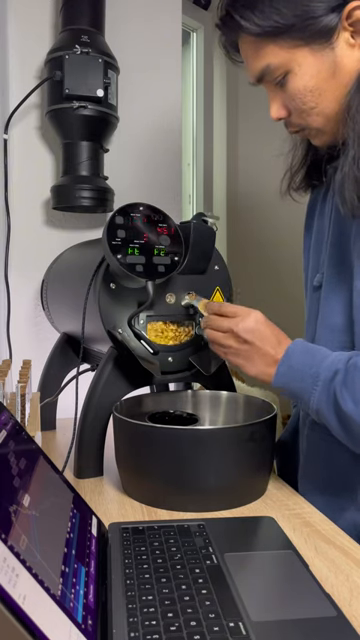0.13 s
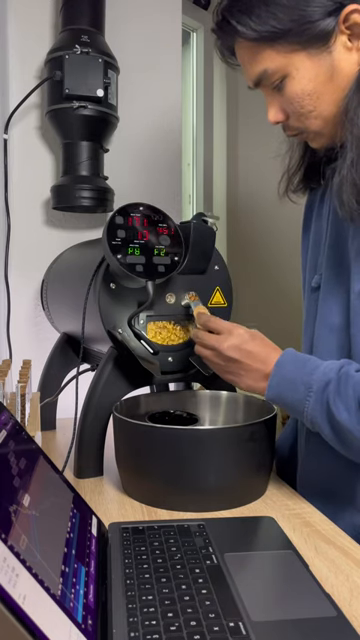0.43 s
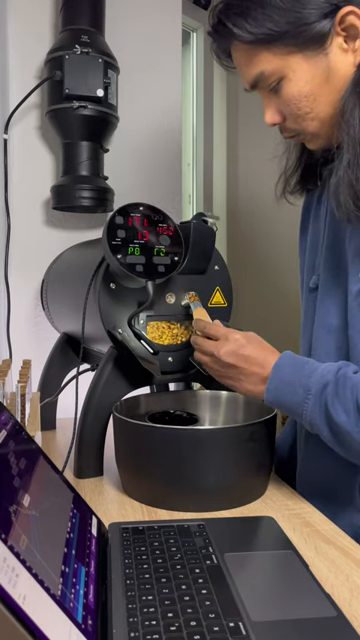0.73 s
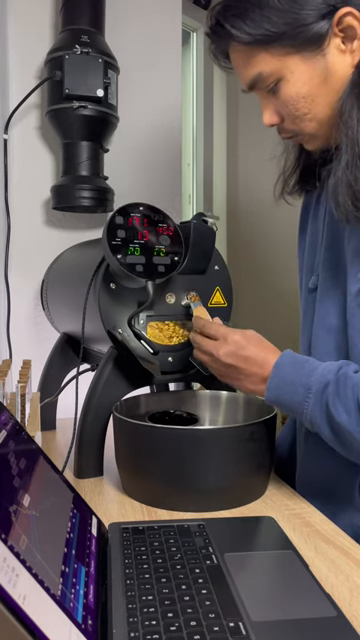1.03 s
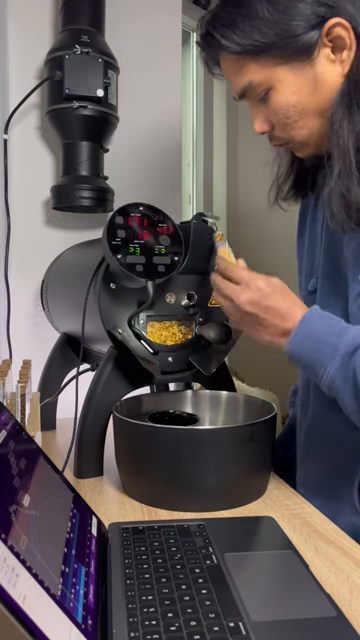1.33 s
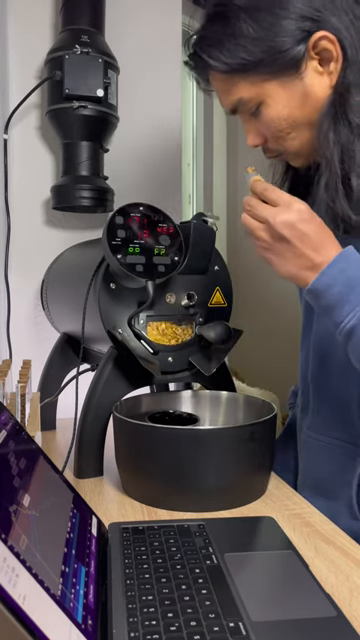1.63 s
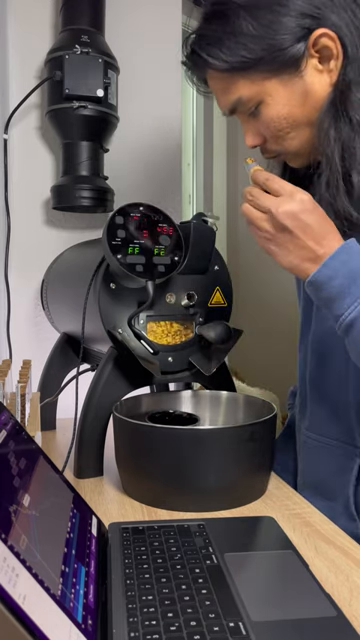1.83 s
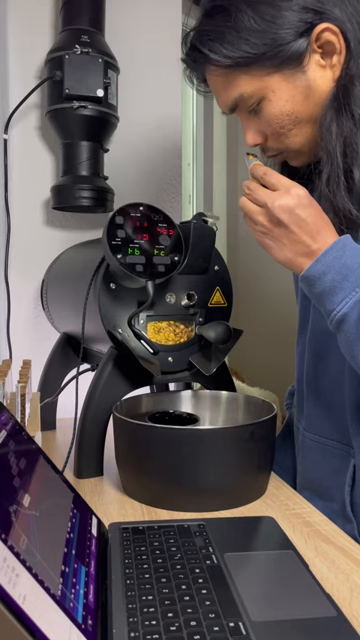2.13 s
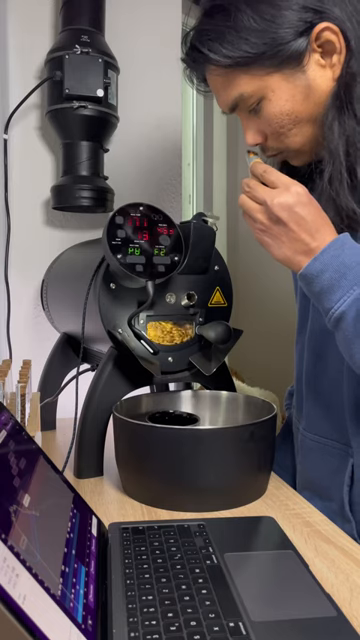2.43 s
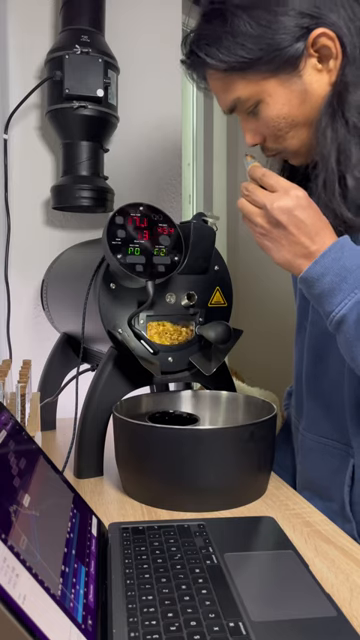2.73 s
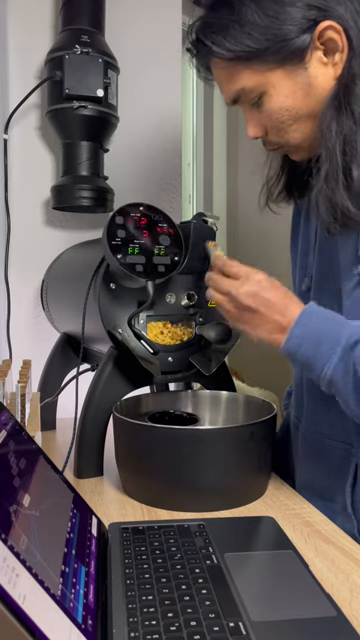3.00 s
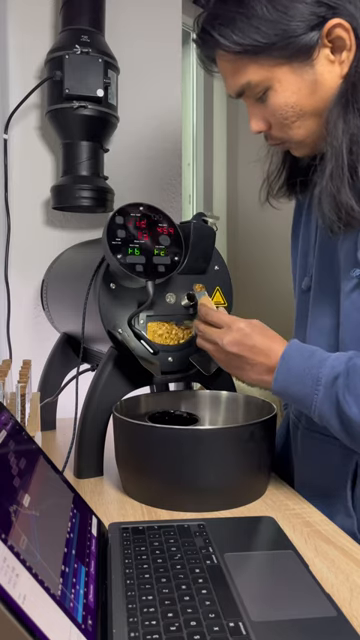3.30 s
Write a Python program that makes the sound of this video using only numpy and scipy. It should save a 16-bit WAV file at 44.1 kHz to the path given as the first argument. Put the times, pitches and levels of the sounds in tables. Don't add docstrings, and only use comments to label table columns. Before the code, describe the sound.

Continuous roasting machine in a small room: beans shower on ringing steel in rapid pulsing swishes, duct air rushes, a mid-pitched motor hum holds, faint low traffic rumbles behind; heard in stereo from a metre.

```python
import sys
import numpy as np
from scipy import signal
from scipy.fft import rfft, irfft, next_fast_len
from scipy.io import wavfile
from scipy.ndimage import uniform_filter1d

SR = 44100
rng = np.random.default_rng(int(sys.argv[2]) if len(sys.argv) > 2 else 0)


def int16_out(signal):
    q = np.round(np.clip(np.atleast_2d(signal).T, -1, 1) * 32767)
    wavfile.write(sys.argv[1], SR, q.astype(np.int16))


def ratio(d):
    e = np.asarray(d, float) / 20
    return 10 ** e


N = 152586
SIZE = next_fast_len(N + SR)
HZ = np.arange(SIZE // 2 + 1) * SR / SIZE + 1e-3


def level(x, db):
    return x * ratio(db) / np.sqrt(np.mean(x ** 2))


def along(table, axis=1):
    rows = np.array(table)
    return np.interp(np.log(HZ), np.log(rows[:, 0]), rows[:, axis])


def ring(hz, width, db):
    return ratio(db) / (1 + 1j * (HZ - hz ** 2 / HZ) / max(width, 2))


def walk(rate):
    hold = int(SR / rate)
    steps = np.repeat(rng.standard_normal(N // hold + 1), hold)
    return 1.456 * uniform_filter1d(uniform_filter1d(steps, hold), hold)[:N]


def ports(shared, other, table):
    like = np.clip(along(table), 0, 1)
    turn = np.exp(.5j * along(table, axis=2)) * ratio(along(table, axis=3) / 2)
    common = np.sqrt(.5 + like / 2) * shared
    opposed = np.sqrt(.5 - like / 2) * other
    return irfft(np.array([(common + opposed) * turn, (common - opposed) / turn]), SIZE)[:, :N]


def spilling():
    # (start [s], level [dB], rise [s], fall [s])
    spills = [(-.06, 2.5, 0.025, 0.11), (.19, 0.5, 0.039, 0.16), (.455, -2, 0.016, 0.15),
              (.70, 2, 0.046, 0.13), (.96, 4.5, 0.074, 0.1), (1.21, 3, 0.076, 0.13),
              (1.485, 2, 0.039, 0.11), (1.76, 0, 0.018, 0.12), (2.0, -0.5, 0.019, 0.15),
              (2.24, -0.5, 0.02, 0.19), (2.5, -0.5, 0.034, 0.16), (2.74, 0.5, 0.08, 0.15),
              (3.02, 2, 0.048, .13), (3.25, 2.5, 0.078, 0.13)]
    # (start [s], level [dB], rise [s], fall [s])
    clumps = [
        (.10, 0, .015, .04),
        (.355, -3.5, .015, .04),
        (.63, -9, .02, 0.062),
        (1.15, -7, .015, 0.037),
        (1.69, -6, .015, 0.045),
        (1.92, -6, .015, 0.054),
        (2.42, -5, .015, 0.037),
        (2.85, -2.5, .02, 0.045),
        (3.34, 2, .015, 0.032),
    ]
    rolling_db = -5
    t, power = np.arange(N) / SR, ratio(2 * rolling_db)
    for start, db, rise, fall in spills + clumps:
        since = np.maximum(t - start, 0)
        swell = 1 - np.exp(-(since / rise) ** 2)
        power = power + ratio(2 * db) * swell * np.exp(-(since / fall) ** 2)
    return np.sqrt(power)


def bean_rain(flow, count=7):
    # (frequency [Hz], level [dB])
    click = [(900, -35), (2000, -23), (4600, -11.5), (5400, -12.5), (7000, -9), (9100, -14), (12300, -16),
             (14000, -28)]
    # (frequency [Hz], width [Hz], level [dB])
    drum = [(2400, 90, -8), (3450, 200, -8), (4120, 200, -7), (4830, 120, -9), (5700, 150, -3),
            (5870, 100, -2), (6330, 140, -1), (6550, 120, 0), (6790, 120, 0), (6970, 130, 2),
            (7270, 130, -1), (7580, 150, -5), (7950, 100, -9), (8420, 250, -11)]
    # (frequency [Hz], frequency [Hz])
    bean_sizes = (1820, 13570)
    beans_per_s, scatter_db, patchy_db = 8000, 2.3, 1.8
    out, centres = 0, np.linspace(*bean_sizes, num=count)
    spacing = centres[1] - centres[0]
    for patch, hz in enumerate(centres):
        hit = rng.random(N)
        size = rng.exponential(size=N)
        sign = np.sign(rng.standard_normal(N))
        clicks = (hit < beans_per_s / SR / 2) * sign * ratio(scatter_db * size)
        band = np.cos(np.clip((HZ - hz) / spacing, -1, 1) * np.pi / 2)
        modes = sum(ring(*mode) for mode in drum[patch::count])
        body = ratio(along(click)) * band + modes
        out = out + rfft(clicks * flow * ratio(patchy_db * walk(21.97)), SIZE) * body
    return out


def beans():
    # (frequency
    # [Hz], likeness [0-1], left leads [rad], left louder [dB])
    bean_ports = [(2000, .8, .2, 1), (3200, .4, 1.6, 0), (4100, .75, .7, 0), (4900, .2, 2.9, 2),
                  (5200, .98, 6.28, 0), (6000, .94, 6.68, 0), (7900, .8, 8.5, 0), (8900, .98, 9.33, 0),
                  (11300, .985, 9.5, 0), (12300, .55, 11, 0), (13400, .9, 12.4, 0)]
    room_t60_s, room_db = .35, -9
    flow, t = spilling(), np.arange(SR // 2) / SR
    tail = rng.standard_normal(len(t)) * ratio(-60 * t / room_t60_s)
    room = 1 + rfft(level(tail, room_db) / np.sqrt(len(t)), SIZE)
    shared = bean_rain(flow) * room
    other = bean_rain(flow, count=4) * room
    return level(ports(shared, other, bean_ports), -33)


def rush():
    # (frequency [Hz], level [dB])
    air = [(30, -46), (95, -5), (250, -1), (420, -2.5), (900, -4), (1400, -6.5), (4900, -13.5), (5400, -34)]
    # (frequency [Hz], width [Hz], level [dB])
    casing_modes = [(213.4, 11, 1.5), (113, 23, 8), (169, 25, -7), (275.8, 14.3, 8.5), (321.5, 8.1, 3.5),
                    (679, 76, 5), (848, 23, 5), (958, 27, 11.5), (957, 13, 2.5), (1632, 33, 8.5),
                    (1917, 110, 3), (2436, 210, 5.5), (3070, 14.6, 13), (511, 51, 6.5)]
    # (frequency [Hz], likeness [0-1], left leads [rad], left louder [dB])
    air_ports = [(40, .999, 0, -.3), (300, .985, .12, -2.6), (480, .97, .45, -1), (720, .92, .75, 0),
                 (1050, .45, .1, 1.2), (1800, .9, .15, 1.2), (2800, .25, .8, 0), (4100, .7, .7, 0),
                 (5000, .2, 2.6, 1.5)]
    swell_db, flicker_db = 0.2, 0.9
    out, swell = 0, walk(1.03)
    resonance = sum(np.abs(ring(*mode)) ** 2 for mode in casing_modes)
    casing = np.sqrt(1 + resonance) * ratio(along(air))
    for hz in 30 * 2. ** np.arange(9):
        band = np.cos(np.clip(np.log2(HZ / hz), -1, 1) * np.pi / 2)
        noise = rng.standard_normal((2, N)) * ratio(swell_db * swell + flicker_db * walk(7.94))
        out = out + rfft(noise, SIZE) * band
    return level(ports(*(out * casing), air_ports), -34.5)


def hum():
    # (frequency [Hz], level [dB], wobble [dB], left louder [dB], left leads [rad])
    tones = [(558.2, -38.9, .6, 3, .71), (519.5, -51.5, 2, -1, .57), (723, -50.5, 2.5, -2, 1.03),
             (965, -55, 2, -1, -.47), (1116.4, -57, 1.5, 9, -2.57), (1276, -61, 2, 3, .83),
             (1809, -57, 2.5, 0, .1), (1868, -57, 2.5, 0, .47), (1939, -61, 2, 0, .2)]
    drift_hz = 0.496
    out, t = 0, np.arange(N) / SR
    drift = np.cumsum(walk(2.91)) / SR * drift_hz / tones[0][0]
    side = np.array([[.5], [-.5]])
    for hz, db, wobble_db, pan_db, lead in tones:
        size = ratio(db + wobble_db * walk(9.31) + side * pan_db)
        phase = 2 * np.pi * (hz * (t + drift) + rng.random()) + side * lead
        out = out + np.sqrt(2) * size * np.sin(phase)
    return out


def traffic():
    # (time [s], level [dB])
    passing = [
        (0.0, -55),
        (0.58, -52),
        (2.77, -59),
        (2.84, -57),
        (3.24, -56),
        (3.46, -77),
    ]
    wall = ring(54.7, 21, 0) ** 2
    low = irfft(rfft(rng.standard_normal(N), SIZE) * wall, SIZE)[:N]
    power = uniform_filter1d(low ** 2, size=SR // 8)
    low = low / np.sqrt(power + 0.15 * np.mean(low ** 2))
    rows = np.array(passing)
    return level(low, 0) * ratio(np.interp(np.arange(N) / SR, rows[:, 0], rows[:, 1]))


def scene():
    return beans() + rush() + hum() + traffic()


def band_limit(x):
    return signal.sosfilt(signal.butter(12, 14100, fs=SR, output="sos"), x)


def record(dry):
    return band_limit(dry)


dry = scene()
out = record(dry)
int16_out(out)
```